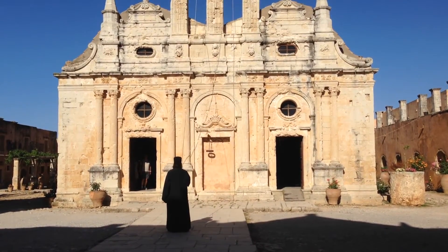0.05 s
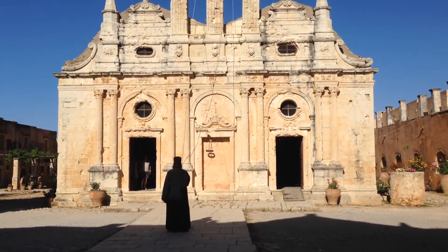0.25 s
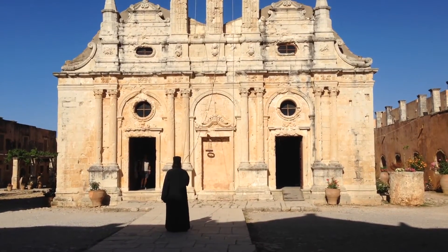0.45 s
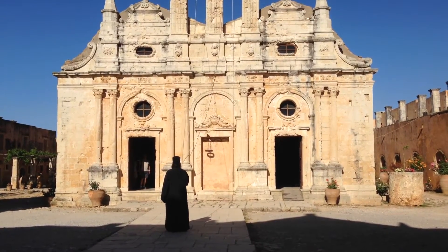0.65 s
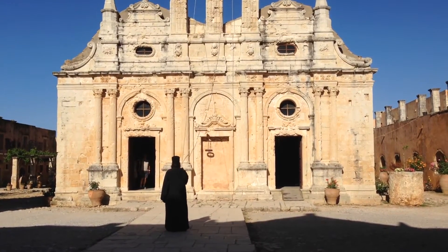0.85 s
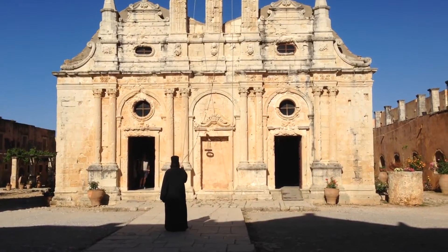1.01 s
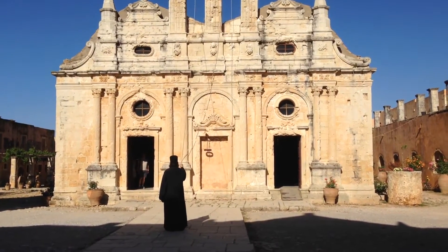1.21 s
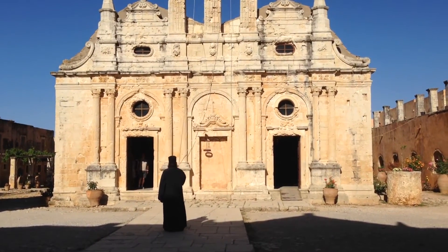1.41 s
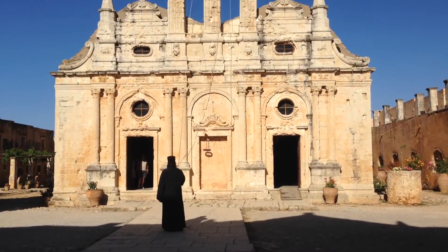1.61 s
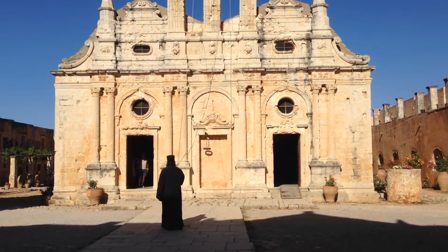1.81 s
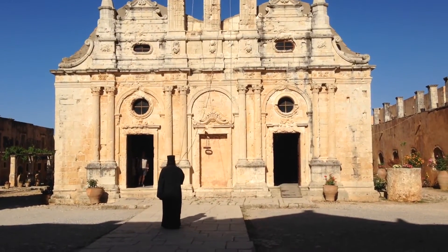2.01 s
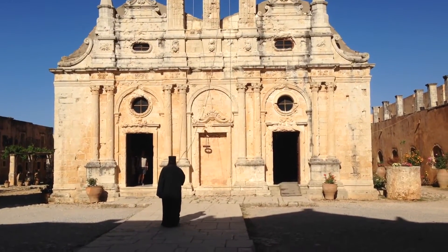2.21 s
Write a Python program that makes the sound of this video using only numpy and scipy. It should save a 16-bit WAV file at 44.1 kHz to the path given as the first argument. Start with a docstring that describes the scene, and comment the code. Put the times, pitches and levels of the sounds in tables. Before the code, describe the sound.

A large church bell is already humming from an earlier stroke. It is struck at about 0.2 seconds and again, slightly brighter, at about 1.7 seconds. Each stroke starts with a metallic clank and a quickly fading shimmer, then leaves long, wavering tones that are still ringing at the end. The stone courtyard adds a light echo, with very faint outdoor hiss underneath.

```python
"""Church bell in a stone courtyard

Still humming from an earlier stroke, the bell is struck twice. Each blow gives a clank and a thud, with
a brief overload tick at its loudest peak, then a quick shimmer and long partials that beat in pairs, as
the bell is not quite round. The walls answer; underneath lie faint air, hiss and scuffs on the paving."""
import sys
import numpy as np
from scipy import signal
from scipy.fft import rfft, irfft, next_fast_len
from scipy.io import wavfile
from scipy.ndimage import map_coordinates

SR = 44100
rng = np.random.default_rng(int(sys.argv[2]) if len(sys.argv) > 2 else 0)


def unload_wav(signal):
    """Save mono or channel-first audio to the path in sys.argv[1] as 16-bit WAV at rate SR, clipped to [-1, 1]."""
    wavfile.write(
        sys.argv[1],
        SR,
        np.round(np.clip(np.atleast_2d(signal).T, -1, 1) * 32767).astype(np.int16),
    )


N = 103635

# the blows, with their overload tick and EQ: start_s, tick_db, bass_db, middle_db, treble_db
BLOWS = [(.204, -46.5, 0, 1, 0), (1.659, -35.5, 0.65, 0.33, 5)]
# bass, middle and treble points of that EQ: frequency_hz
BLOW_EQ_HZ = [370, 2190, 6000]
# hum, prime, tierce, nominal, superquint and two bright upper tones: pitch_hz
LEAD_PITCHES = [369.6, 727.7, 861.8, 1459.8, 2187.3, 3898, 4836]
# their ring before LEAD_GAIN_DB, a block per blow and a row per pitch:
# level_db, t60_s, twin_offset_hz, twin_level_db, twin_t60_s, first_dip_s
LEAD_PAIRS = [
    [(-36.4, 25, 1.2, -36.5, 3.5, .48), (-50.3, 25, 1.67, -44, 1.8, .26),
     (-36.8, 7.4, 1.04, -53.5, 7.2, .32), (-12, 1.52, 3.3, -27.5, 1.85, .18),
     (-22.5, 2.1, 9.65, -30, 3.5, .1), (-30, 1.33, 1.35, -44, 1.75, .5), (-26, 1.25, 5, -33, .85, .05)],
    [(-33.2, 25, 2.3, -38.5, 1.55, .41), (-50.5, 15, 11.1, -52.6, 9.6, .007),
     (-34.4, 5.7, 1.6, -51, 7.9, .39), (-12, 1, 3.33, -33, 4, .154), (-24.5, 2.5, 10.4, -29.5, 2.9, .09),
     (-33.5, 2.6, 2.8, -43, 4, .24), (-25, 1.31, 1.97, -35.5, 1.75, .084)],
]
# hum of the earlier stroke: pitch_hz, level_db
LINGERING_HUM = [(369.6, -33), (727.7, -52), (861.8, -38), (1171.6, -63), (1459.8, -58), (2187.3, -50),
                 (2197, -59), (2547, -68), (3450, -72)]
# quieter partials: pitch_hz, level_db, t60_s, twin_offset_hz, twin_gain (negative starts in a dip)
LESSER_PAIRS = [ (1171.6, -45, 4.2, 8.6, -.25), (1955.5, -26.5, 1.45, 28.8, .55),
                (2547, -38, 2.2, 4.4, .25), (3006.5, -36, 1.25, 23.9, -.45), (3185.6, -39, 1.3, 24, .3),
                (3227, -36, 1.2, -18.6, .4), (3450, -38.5, 1.6, 1, .1), (3625, -45, 1.1, 7, .5),
                (3930.5, -38, 1.4, 2, .2), (4048, -52, 1.2, 1.2, .3), (4877, -38, 1.15, 44, .3),
                (5304, -40, .9, 3, -.35), (5378, -48, 1.1, 6.6, -.2), (5603, -46, .85, 3.4, -.3),
                (5821, -39, 1, -18.3, .25), (6467, -53, 1.15, 2.2, .2), (6773, -47, .85, 4, -.15),
                (7180, -53, 1, 4.2, -.3)]
# distinct tones in the shimmer, before TOP_TONES_GAIN_DB: pitch_hz, level_db
TOP_TONES = [(7569, -78), (7795, -78), (8145, -61), (8479, -71), (8619, -77.5), (8748, -68.5),
             (9313, -73.5), (9555, -73), (10282, -67), (11251, -79.5)]
# level curve of the dense, weak upper modes: pitch_hz, level_db
SHIMMER_LEVELS = [(2400, -41.5), (3050, -48.5), (3700, -49), (4200, -55.5), (4400, -48), (5600, -46),
                  (6150, -55.5), (7000, -48.5), (8500, -72.5), (11000, -66), (15000, -85.5)]
# decay curve of the shimmer: pitch_hz, t60_s
SHIMMER_DECAY = [(2400, 0.69), (5000, 0.78), (8000, 0.5), (11000, 0.57), (15000, 0.11)]
# damped tones of clapper on bronze: pitch_hz, level_db, t60_s
CLANK_TONES = [(237.4, -26, 0.075), (1514, -27.5, 0.13), (1974, -5.5, 0.06), (2204, -7.5, 0.07),
               (3895, -15, .09)]
# noise burst of the contact: frequency_hz, relative_db
BURST_SPECTRUM = [(40, -36), (140, -38.5), (230, -8), (350, 1.5), (550, -10.5), (950, -8), (1500, 4),
                  (2200, -28.5), (3500, -5.5), (6000, -11), (9000, -29), (15000, -36)]
# colour of the overload tick: frequency_hz, relative_db
TICK_SPECTRUM = [(300, -48), (3000, -17.5), (7000, 13), (15000, -14.5)]
# reverb time of the courtyard: frequency_hz, t60_s
COURTYARD_DECAY = [(200, 0.55), (600, 2.25), (1500, 1.65), (4000, 0.97), (8000, 0.17), (15000, 0.05)]
# scuffs on the paving: centre_s, level_db, half_length_s
SCUFF_EVENTS = [(0.817, -64, 0.028), (0.939, -61.5, 0.013), (1.431, -77, 0.007)]
# their gritty colour: frequency_hz, relative_db
SCUFF_SPECTRUM = [(300, -9), (1700, -12.5), (4500, 5.5), (8000, -9.5), (15000, -13)]
# outdoor air and hiss: frequency_hz, relative_db
AIR_SPECTRUM = [(20, -15.5), (55, -7), (110, -7.5), (260, -3.5), (550, -10.5), (1000, -17.5), (2000, -14),
                (4000, -15), (8000, -20.5), (15000, -21.5)]

ATTACK_S, HANDOVER_S, HUM_T60_S = 0.0062, 0.018, 9
LEAD_GAIN_DB, TOP_TONES_GAIN_DB = 0.93, 9.5
WAVER_DB, WAVER_RATE_HZ, FULL_WAVER_HZ = 2.34, 23, 3840
DRIFT_RAD_PER_HZ, DRIFT_RATE_HZ = .05, 6  # unevenness of the lead beats
SHIMMER_LOW_HZ, SHIMMER_HIGH_HZ, SHIMMER_MEAN_BEAT_HZ, SHIMMER_TWIN_GAIN = 2400, 15000, 8.1, 0.72
CLANK_RISE_S, BURST_DB, BURST_T60_S = 0.004, -11, 0.04
TICK_DELAY_S, TICK_HALF_S = 0.0093, 0.00054
REVERB_SEND_DB, REVERB_RISE_S, AIR_DB = -17, 0.016, -64.5
NOTCH_HZ, NOTCH_WIDTH_HZ, NOTCH_DB, TOP_HZ = 2860, 78, -11.5, 15500


def bell():
    """Each blow restarts the main ring as the old one gives way; impacts and upper ring feed the reverb."""
    ring = sum(amp(db) * tone(hz) for hz, db in LINGERING_HUM) * fade(since(0), HUM_T60_S)
    upper, impacts = np.zeros(N), np.zeros(N)
    modes = shimmer_modes()
    for (start_s, tick_db, *eq_db), pairs in zip(BLOWS, LEAD_PAIRS):
        t = since(start_s)
        eq = list(zip(BLOW_EQ_HZ, eq_db))
        ring = ring * (1 - rise(t, HANDOVER_S)) + lead_partials(t, pairs)
        upper += lesser_partials(t, eq) + shimmer(t, eq, modes)
        impacts += clank(t, eq) + amp(tick_db) * overload_tick(start_s)
    reverb = courtyard(impacts) + courtyard(upper)
    return ring + upper + impacts + amp(REVERB_SEND_DB) * reverb


def lead_partials(t, pairs):
    """The body of the ring: the bell is not quite round, so each tone beats against a detuned twin."""
    ring = np.zeros(N)
    for hz, (db, t60, offset_hz, twin_db, twin_t60, dip_s) in zip(LEAD_PITCHES, pairs):
        drift = DRIFT_RAD_PER_HZ * offset_hz * wobble(DRIFT_RATE_HZ)
        beat_phase = 2 * np.pi * offset_hz * (t - dip_s) + drift
        main = amp(db + waver_db(hz)) * fade(t, t60) * tone(hz)
        twin = amp(twin_db) * fade(t, twin_t60) * tone(hz, beat_phase)
        ring += main - twin
    return amp(LEAD_GAIN_DB) * ring * rise(t, ATTACK_S)


def lesser_partials(t, eq):
    """Quieter pairs of tones that beat and waver as they fade."""
    ring = np.zeros(N)
    phases = rng.uniform(0, 2 * np.pi, len(LESSER_PAIRS))
    for (hz, db, t60, offset_hz, twin_gain), phase in zip(LESSER_PAIRS, phases):
        pair = tone(hz, phase) + twin_gain * tone(hz, phase + 2 * np.pi * offset_hz * t)
        ring += amp(db + curve_at(eq, hz) + waver_db(hz)) * fade(t, t60) * pair
    return ring * rise(t, ATTACK_S)


def waver_db(hz):
    """Random flutter in a partial's level, deeper for the high ones."""
    return WAVER_DB * min(hz / FULL_WAVER_HZ, 1) * wobble(WAVER_RATE_HZ)


def shimmer(t, eq, modes):
    """A bright wash of beating upper modes; the very highest die first."""
    wash = np.zeros(N)
    for (hz, db), (phase, detune, twin_phase) in zip(modes, rng.random((len(modes), 3))):
        twin_hz = hz + 2 * SHIMMER_MEAN_BEAT_HZ * detune
        main = np.sin(2 * np.pi * (hz * t + phase))
        twin = SHIMMER_TWIN_GAIN * np.sin(2 * np.pi * (twin_hz * t + twin_phase))
        wash += amp(db + curve_at(eq, hz)) * fade(t, curve_at(SHIMMER_DECAY, hz)) * (main + twin)
    return wash * rise(t, ATTACK_S)


def shimmer_modes(count=70):
    """The distinct top tones plus a scatter of weak modes: pitch_hz, level_db."""
    places = (np.arange(count) + rng.random(count)) / count
    pitches = SHIMMER_LOW_HZ * (SHIMMER_HIGH_HZ / SHIMMER_LOW_HZ) ** places
    levels = curve_at(SHIMMER_LEVELS, pitches) + rng.uniform(-8.5, 5, count)
    return [(hz, db + TOP_TONES_GAIN_DB) for hz, db in TOP_TONES] + list(zip(pitches, levels))


def clank(t, eq):
    """Clapper meets bronze: a few heavily damped tones and a thud of noise."""
    tones = sum(amp(db) * fade(t, t60) * np.sin(2 * np.pi * hz * t) for hz, db, t60 in CLANK_TONES)
    burst = filtered(noise(BURST_SPECTRUM), lambda hz: amp(curve_at(eq, hz)))
    burst *= amp(BURST_DB) * fade(t, BURST_T60_S) * rise(t, ATTACK_S)
    return tones * rise(t, CLANK_RISE_S) + burst


def overload_tick(start_s):
    """A sliver of bright noise that sounds like a brief overload at the loudest peak."""
    return noise(TICK_SPECTRUM) * swell(start_s + TICK_DELAY_S, TICK_HALF_S)


def courtyard(send):
    """The diffuse answer of the stone walls; the treble dies first."""
    hz, t, bands = signal.stft(rng.standard_normal(SR * 3 // 2), SR, nperseg=256)
    bands = bands * fade(t, curve_at(COURTYARD_DECAY, hz)[:, None])
    tail = signal.istft(bands, SR, nperseg=256)[1]
    tail *= rise(np.arange(len(tail)) / SR, REVERB_RISE_S)
    return signal.fftconvolve(send, tail / np.linalg.norm(tail))[:N]


def scuffs():
    """Soft scuffs on the paving: brief swells of gritty noise."""
    envelope = sum(amp(db) * swell(centre_s, half_s) for centre_s, db, half_s in SCUFF_EVENTS)
    return envelope * noise(SCUFF_SPECTRUM)


def air():
    """A steady bed of still outdoor air and faint hiss."""
    return amp(AIR_DB) * noise(AIR_SPECTRUM)


def amp(db):
    """Decibels to gain."""
    return 10 ** (np.asarray(db) / 20)


def curve_at(points, hz):
    """Read a curve of (frequency_hz, value) points on a log frequency axis."""
    frequencies, values = np.transpose(points)
    return np.interp(np.log(hz + 1), np.log(frequencies + 1), values)


def since(start_s):
    """Seconds since start_s at every sample, 0 before it."""
    return np.maximum(np.arange(N) / SR - start_s, 0)


def fade(t, t60):
    """Exponential decay, 60 dB down after t60 seconds."""
    return np.exp(-np.log(1000) * t / t60)


def rise(t, seconds):
    """Smooth attack from 0 to 1."""
    return 1 - np.exp(-(t / seconds) ** 2)


def swell(centre_s, half_s):
    """A rounded swell peaking at centre_s."""
    return np.exp(-.5 * ((np.arange(N) / SR - centre_s) / half_s) ** 2)


def wobble(rate_hz):
    """Smooth random modulation through rate_hz knots a second."""
    knots = rng.standard_normal(256)
    coarse = np.arange(0, N + 64, 64)
    curve = map_coordinates(knots, [coarse * rate_hz / SR], mode="mirror")
    return np.interp(np.arange(N), coarse, curve)


def tone(hz, phase=0):
    """A sine; a moving phase detunes it."""
    return np.sin(2 * np.pi * hz * np.arange(N) / SR + phase)


def filtered(x, gain_at):
    """EQ x with a gain given as a function of frequency."""
    size = next_fast_len(N + SR // 2)
    hz = np.fft.rfftfreq(size, 1 / SR)
    return irfft(rfft(x, size) * gain_at(hz), size)[:N]


def noise(spectrum):
    """Coloured noise at rms 1."""
    coloured = filtered(rng.standard_normal(N), lambda hz: amp(curve_at(spectrum, hz)))
    return coloured / np.sqrt(np.mean(coloured ** 2) + 1e-20)


def scene():
    """The bell over the quiet courtyard, in mono."""
    return (bell() + air() + scuffs())[None]


def record(dry):
    """Master EQ: one narrow notch and a hard cut at the top."""
    notch = lambda hz: amp(NOTCH_DB * np.exp(-.5 * ((hz - NOTCH_HZ) / NOTCH_WIDTH_HZ) ** 2))
    return filtered(dry[0], lambda hz: notch(hz) * (hz < TOP_HZ))[None]


dry = scene()
out = record(dry)
unload_wav(out)
```